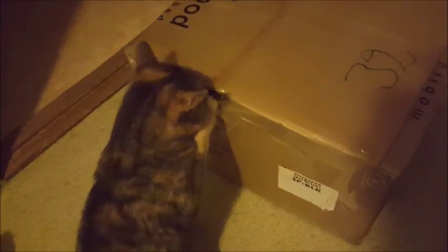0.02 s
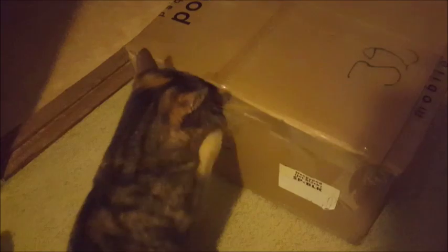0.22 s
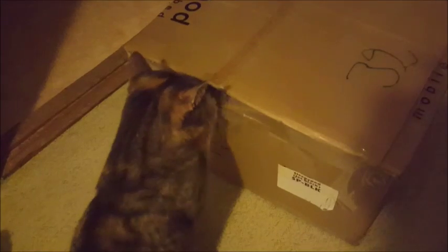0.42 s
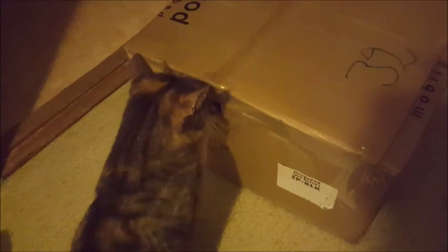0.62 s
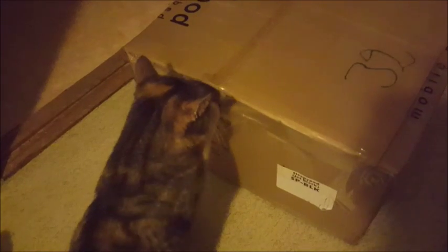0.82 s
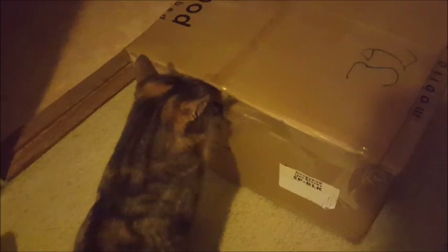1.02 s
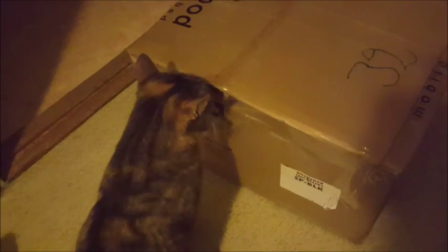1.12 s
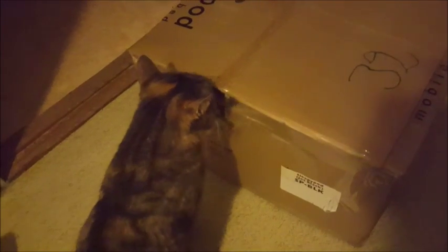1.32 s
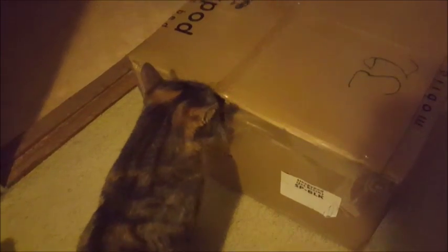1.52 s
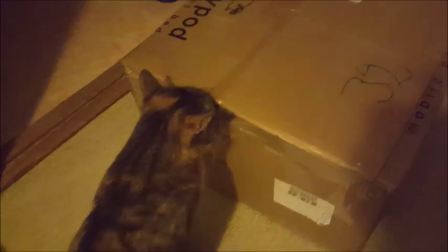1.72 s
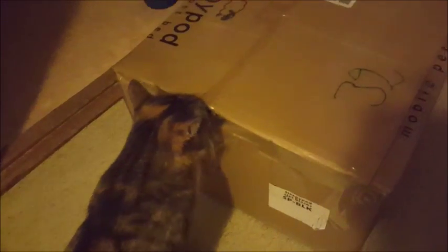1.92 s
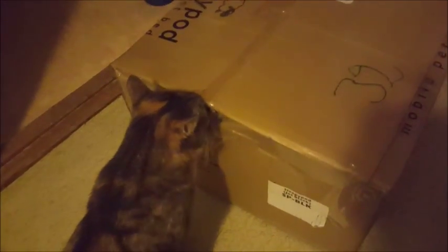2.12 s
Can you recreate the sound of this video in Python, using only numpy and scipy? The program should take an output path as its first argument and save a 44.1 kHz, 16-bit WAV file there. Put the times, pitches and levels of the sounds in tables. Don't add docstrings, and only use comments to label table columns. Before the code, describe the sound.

A cat tugs at a taped cardboard box: faint ticks and bumps, one loud sharp tape snap with a short room ring, then sparse quiet scrapes and clicks, close microphone in a quiet carpeted room.

```python
import sys
import numpy as np
from scipy import signal
from scipy.fft import rfft, irfft, next_fast_len
from scipy.io import wavfile
from scipy.ndimage import map_coordinates

SR = 44100
rng = np.random.default_rng(int(sys.argv[2]) if len(sys.argv) > 2 else 0)


def wav_out(sig):
    wavfile.write(sys.argv[1], SR, np.round(np.clip(np.atleast_2d(sig).T, -1, 1) * 32767).astype(np.int16))


def nominal_scale(level):
    x = np.asarray(level, float) / 20
    return 10 ** x


N = 97020

# freq_hz [Hz], level_db [dB]
BOARD_COLOUR = [(200, -7.5), (450, -0.5), (900, -4.5), (2000, -8), (4000, -10), (8000, -17), (16000, -37)]


def unit(x):
    return x / np.sqrt(np.mean(x ** 2) + 1e-20)


def along(points, hz):
    f, v = np.transpose(points)
    return np.interp(np.log(hz + 1), np.log(f + 1), v)


def filtered(x, response):
    m = next_fast_len(x.shape[-1] + 8192)
    spectrum = rfft(x, m) * response(np.fft.rfftfreq(m, 1 / SR))
    return irfft(spectrum, m)[..., :x.shape[-1]]


def causal(points, size=2048):
    cepstrum = irfft(np.log(nominal_scale(along(points, np.fft.rfftfreq(size, 1 / SR)))), size)
    cepstrum[1:size // 2] *= 2
    cepstrum[size // 2 + 1:] = 0
    pulse = irfft(np.exp(rfft(cepstrum)), size)
    return pulse / np.linalg.norm(pulse)


def pair(spectrum, alike, size):
    def response(hz):
        angle = np.arccos(np.clip(along(alike, hz), -1, 1)) / 2
        return nominal_scale(along(spectrum, hz)) * [np.cos(angle), np.sin(angle)]

    mid, side = filtered(rng.standard_normal((2, size)), response)
    return unit(np.array([mid + side, mid - side]))


def left_lag(hz, lag_s):
    return np.exp(1j * np.pi * hz * [[-lag_s], [lag_s]])


def room(x):
    # freq_hz [Hz], t60_s [s]
    decay_times = [(100, 0.45), (500, 0.37), (1000, 0.45), (1600, 0.33), (3000, 0.43), (5000, 0.32),
                   (10000, .25), (16000, 0.15)]
    # freq_hz [Hz], likeness [-1 to 1]
    tail_likeness = [(100, 1), (400, 0.93), (1000, 0.16), (4000, 0.15)]
    build_s = 0.0031
    hz, t, z = signal.stft(pair([(100, 0)], tail_likeness, SR), SR, nperseg=256)
    decay = nominal_scale(-60 * t / np.abs(along(decay_times, hz))[:, None])
    tail = signal.istft(z * decay, SR, nperseg=256)[1]
    tail = tail * (1 - np.exp(-np.arange(tail.shape[1]) / SR / build_s))
    return signal.fftconvolve(x[None], tail / np.linalg.norm(tail[0]), axes=1)[:, :N]


def grit(size):
    grains_per_s, grain_db = 7000, 2.5
    chance, luck = rng.random((2, size))
    spikes = (chance < grains_per_s / SR) * nominal_scale(-grain_db * np.log(luck + 1e-9))
    return unit(rng.standard_normal(size) * (.6 + spikes))


def stroke(t, start_s, rise_s, hold_s):
    fall_s = .011
    rise = np.clip((t - start_s) / rise_s, 0, 1)
    return rise * np.exp(-np.clip(t - start_s - rise_s - hold_s, 0, None) / fall_s)


def slip():
    t = np.arange(256) / SR
    return (.22 * rng.standard_normal(256) - (t == 0)) * np.exp(-t / .0004)


def snap():
    # start_s [s], peak_db [dB]
    slip_times = [
        (.2046, -30),
        (.2059, -13),
        (.2075, -4),
        (.2083, -12),
        (.209, -10),
        (.2094, -15),
        (.2098, -14),
        (.2106, -15),
        (.2110, -12),
        (.2119, -18),
    ]
    # start_s [s], left_db [dB], right_db [dB]
    wall_replies = [
        (.2152, -14, -17),
        (.2171, -13, -11),
        (.2189, -15, -11),
        (.2208, -15, -13),
        (.2222, -15, -12),
        (.2235, -13, -12),
        (.2255, -16, -14),
        (.2337, -18, -17),
        (.2378, -18, -21),
    ]
    # freq_hz [Hz], level_db [dB]
    left_colour = [(30, -45), (90, -24), (700, -7), (1200, 0), (2300, -7.5), (3100, 0.5), (4200, -4.5),
                   (6200, -6), (9000, -10), (15500, -24)]
    # freq_hz [Hz], level_db [dB]
    right_colour = [(30, -45.5), (90, -24), (700, -8.5), (1300, -3.5), (2500, -8), (4000, -3), (6000, 3),
                    (8000, -13), (11800, -8.5), (15500, -24)]
    # freq_hz [Hz], level_db [dB]
    wall_colour = [(60, -24), (300, -7.5), (1000, 2), (1900, 5.5), (3200, 1.5), (5000, -7), (10000, -29.5),
                   (16000, -43.5)]
    # freq_hz [Hz], level_db [dB]
    far_colour = [(40, -33.5), (90, -3.5), (250, -5), (600, -5.5), (1200, -2), (3000, -6), (6500, -8),
                  (15500, -19)]
    # freq_hz [Hz], level_db [dB], t60_s [s]
    box_modes = [(87.4, -8, 0.48), (151.6, 1.5, 0.073), (198.8, -9, 0.45), (287.3, 0, 0.18),
                 (450, 2.5, 0.1)]
    snap_db, wall_db, box_db, room_db = 12, 7, -28, 8
    lag_s, room_delay_s = .000025, 0.0044

    t, start = np.arange(SR // 2) / SR, round(slip_times[2][0] * SR)
    slips, echoes = np.zeros(N), np.zeros((2, N))
    for s, db in slip_times:
        slips[round(s * SR):][:256] += nominal_scale(db + snap_db) * slip()
    for s, left_db, right_db in wall_replies:
        echoes[:, round(s * SR):][:, :256] += nominal_scale([[left_db], [right_db]]) * nominal_scale(wall_db) * slip()

    ports = [causal(left_colour), nominal_scale(1) * causal(right_colour)]
    crack = signal.fftconvolve(slips[None], ports, axes=1)[:, :N]
    near = filtered(crack, lambda hz: left_lag(hz, lag_s))
    walls = signal.fftconvolve(echoes, causal(wall_colour)[None], axes=1)[:, :N]

    ringing = sum(nominal_scale(db - 60 * t / t60) * np.sin(2 * np.pi * hz * t) for hz, db, t60 in box_modes)
    boom = np.zeros(N)
    boom[start:][:len(t)] = nominal_scale(box_db) * (1 - np.exp(-t / 0.0013)) * ringing

    far = np.pad(causal(far_colour), (start + round(room_delay_s * SR), N))[:N]
    return near + walls + boom + nominal_scale(room_db) * room(far)


def ticks():
    # start_s [s], length_s [s], board_db [dB], tape_db [dB], tape_hz [Hz]
    catches = [(0.041, 0.011, -64.5, -65.5, 7300), (0.0576, 0.0075, -74, -73.5, 8100),
               (0.127, 0.0043, -55.5, -66.5, 3600), (0.158, 0.0064, -56, -56.5, 9000),
               (0.4623, 0.0029, -47.5, -61, 9700), (.4805, 0.0039, -62, -65.5, 10120),
               (0.7084, 0.0038, -62.5, -62, 10070), (0.7334, 0.0058, -69.5, -59.5, 9600),
               (0.9118, 0.0041, -62, -51, 8040), (0.9159, 0.0092, -61.5, -48, 6040),
               (0.9758, 0.048, -62, -73, 5100), (1.0732, 0.0038, -49.5, -52, 12000),
               (1.104, 0.0012, -52, -55.5, 7140), (1.2035, .006, -65, -65.5, 12000),
               (1.209, .012, -61.5, -64, 12050), (1.2374, 0.0034, -54.5, -45, 12600),
               (1.6055, 0.0089, -65, -63, 3200), (1.7866, .009, -65.5, -71, 5050),
               (2.1545, 0.0031, -66.5, -52.5, 12500)]
    tape_q = 1.1
    out, t, board = np.zeros(N + SR), np.arange(4096) / SR, causal(BOARD_COLOUR)
    for s, length, board_db, tape_db, tape_hz in catches:
        def tape(f):
            return 1j * f / (tape_hz ** 2 - f * f + 1j * f * tape_hz / tape_q)

        shape = (1 - np.exp(-t / .0004)) * np.exp(-t / length)
        dull = signal.fftconvolve(grit(len(t)) * shape, board)[:len(t)]
        ring = unit(filtered(grit(len(t)), tape)) * shape
        out[round(s * SR):][:len(t)] += nominal_scale(board_db) * dull + nominal_scale(tape_db) * ring
    return out[:N]


def scrapes():
    # start_s [s], rise_s [s], hold_s [s], board_db [dB], tape_db [dB]
    claw_strokes = [
        (0.12, 0.0028, 0.024, -78, -82.5),
        (0.492, 0.062, 0.024, -60, -74.5),
        (0.532, 0.012, 0.048, -64.5, -55.5),
        (0.713, 0.0078, 0.024, -65.5, -67.5),
        (0.922, 0.0053, 0.065, -65.5, -69.5),
        (1.069, 0.0042, 0.02, -72, -72),
        (1.432, 0.0089, 0.0156, -55.5, -63),
        (1.458, 0.013, 0.0065, -57, -57.5),
        (1.495, 0.0073, 0.01, -62.5, -66),
    ]
    # freq_hz [Hz], level_db [dB]
    tape_colour = [(1000, -24.5), (3000, -5), (5200, -9.5), (6000, 2), (7600, -2), (9200, -3),
                   (10200, -0.5), (12500, -3.5), (15500, -7.5)]
    t, board, tape = np.arange(N) / SR, np.zeros(N), np.zeros(N)
    for s, rise, hold, board_db, tape_db in claw_strokes:
        shape = stroke(t, s, rise, hold)
        board += nominal_scale(board_db) * shape
        tape += nominal_scale(tape_db) * shape
    dull = signal.fftconvolve(board * grit(N), causal(BOARD_COLOUR))[:N]
    return dull + signal.fftconvolve(tape * grit(N), causal(tape_colour))[:N]


def rubs():
    # start_s [s], rise_s [s], hold_s [s], level_db [dB]
    flap_rubs = [
        (0.453, 0.0041, 0.013, -57.5),
        (.479, .004, 0.011, -61.5),
        (0.512, .008, .025, -58.5),
        (.545, .005, 0.035, -65),
        (1.029, 0.0075, 0.013, -71),
        (1.073, .003, 0.018, -63),
    ]
    # freq_hz [Hz], width_hz [Hz], level_db [dB]
    flap_modes = [(887, 162, 1.5), (2000, 830, -6.5)]

    def flap(f):
        return sum(nominal_scale(db) * 1j * f * w / (c * c - f * f + 1j * f * w) for c, w, db in flap_modes)

    t = np.arange(N) / SR
    level = sum(nominal_scale(db) * stroke(t, s, rise, hold) for s, rise, hold, db in flap_rubs)
    return level * unit(filtered(grit(N), flap))


def swings(rows):
    onset_cycles = .15
    out, t = np.zeros(N + SR), np.arange(4096) / SR
    for s, db, hz, cycles in rows:
        shape = np.exp(-t * hz / cycles) * (1 - np.exp(-t * hz / onset_cycles))
        out[round(s * SR):][:len(t)] += nominal_scale(db) * np.sin(2 * np.pi * hz * t) * shape
    return out[:N]


def nudges():
    # start_s [s], peak_db [dB], pitch_hz
    # [Hz], decay_cycles [cycles]
    pushes = [(.041, -47.5, 101, 1), (.113, -55, 134, 1.5), (.1272, -43, 416, 1.2),
              (.1297, -38.5, 520, 0.57), (.1335, -49, 910, 2.2), (.1358, -47, 494, 1.5),
              (.1402, -38, 423, 0.64), (.147, -54, 437, 1.5), (.154, -45, 504, 0.91),
              (.1605, -45, 450, 1.6), (.1635, -54, 506.7, 1.5), (.1705, -48.5, 610, 2.3),
              (.183, -53, 479.7, 1.3), (.1885, -48, 421.6, 1), (.2352, -19, 1119, 4),
              (1.1027, -37, 1400, 0.81), (1.103, -37.5, 2500, 1.2), (1.539, -40, 320, .8),
              (1.6068, -42, 290, 0.66), (1.62, -52.5, 117.4, 1.05), (1.671, -45.5, 310.5, .7),
              (1.7155, -46, 149, .8), (1.7365, -45, 310, .7), (1.785, -53.5, 239.2, 1.03),
              (1.838, -50, 95, .9)]
    return swings(pushes)


def clicks():
    # start_s [s], peak_db [dB], pitch_hz [Hz], decay_cycles [cycles]
    flicks = [
        (.7346, -54.5, 4150, 4.8),
        (.9164, -35.5, 8190, 6.5),
        (.9169, -40, 4900, 3.3),
        (.9171, -46, 2020, 1.5),
        (1.2388, -53, 3300, 3.9),
        (1.2392, -54, 4500, 5),
        (1.4691, -50.5, 4350, 3.7),
    ]
    return swings(flicks)


def background():
    # freq_hz [Hz], level_db [dB]
    hiss_colour = [(15, -23), (32, -1), (60, -4.5), (150, -7.5), (450, -12), (800, -14.5), (1400, -19.5),
                   (8000, -30.5), (15800, -31)]
    # freq_hz [Hz], likeness [-1 to 1]
    hiss_likeness = [(60, 0.61), (240, 0.085), (950, -0.17), (3770, 0.066), (15000, -0.59)]
    # time_s [s], level_db [dB]
    stir_level = [(0.0, -71), (0.26, -68.5), (2.2, -85)]
    # freq_hz [Hz], width_hz [Hz], level_db [dB]
    hum_bands = [(210, 4.3, -82.5), (290, 10, -93.5), (408, 7.3, -78.5), (487, 8, -83), (575, 16, -82.5)]
    # time_s [s], level_db [dB]
    hum_swell = [(0, -66.5), (.6, -75.5), (.68, -78.5), (.78, -64.5), (.88, -74.5), (.97, -80),
                 (1.06, -62.5), (1.19, -75.5), (1.33, -64.5), (1.45, -70.5), (1.8, -66), (1.9, -76.5),
                 (2.05, -75), (2.15, -66.5)]
    hiss_db, stir_db, drone_db, drone_hz, drift_rad = -65, 0.5, -3, 99, 4
    t = np.arange(N) / SR

    def slow(rate_hz):
        return map_coordinates(rng.standard_normal(128), [t * rate_hz])

    def hum_band(hz, width):
        return unit(filtered(rng.standard_normal(N), lambda f: 1 / (1 + ((f - hz) / width) ** 2)))

    hiss = nominal_scale(hiss_db) * pair(hiss_colour, hiss_likeness, N)
    stir = nominal_scale(np.interp(t, *np.transpose(stir_level)) + stir_db + 0.83 * slow(39))
    stir = stir * pair(BOARD_COLOUR, hiss_likeness, N)
    hum = sum(nominal_scale(db) * hum_band(hz, width) for hz, width, db in hum_bands)
    swell = nominal_scale(np.interp(t, *np.transpose(hum_swell)) + drone_db + 0.94 * slow(8.8))
    drone = swell * np.sqrt(2) * np.sin(2 * np.pi * drone_hz * t + drift_rad * slow(8.6))
    return hiss + hum + drone + stir


def scene():
    right_db, lag_s = 3, .00001
    late_s, late_right_db = 1.5, 3
    tick, scrape, nudge, click, rub = ticks(), scrapes(), nudges(), clicks(), rubs()

    def placed(hz):
        return nominal_scale([[-right_db / 2], [right_db / 2]]) * left_lag(hz, lag_s)

    near = filtered(tick + scrape + nudge + click, placed)
    late = nudge * (np.arange(N) > late_s * SR) * (nominal_scale([[-late_right_db], [0]]) - 1)
    to_room = nominal_scale(-6) * tick + nominal_scale(-4) * scrape + nominal_scale(-16) * nudge + nominal_scale(-3) * click
    flap = rub + nominal_scale(-1.5) * room(rub)
    return snap() + near + late + room(to_room) + flap + background()


def top_cut(x):
    return signal.sosfilt(signal.butter(12, 16510, fs=SR, output="sos"), x)


def record(dry):
    ceiling, low_hz, top_hz = .75, 68, 15900
    held = dry / (1 + np.abs(dry / ceiling) ** 4) ** (1 / 4)
    mix = filtered(held, lambda hz: (hz < top_hz) * 1j * hz / (low_hz + 1j * hz))
    return top_cut(mix)


dry = scene()
out = record(dry)
wav_out(out)
```